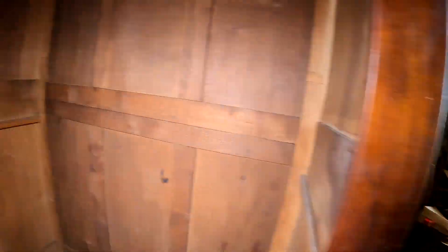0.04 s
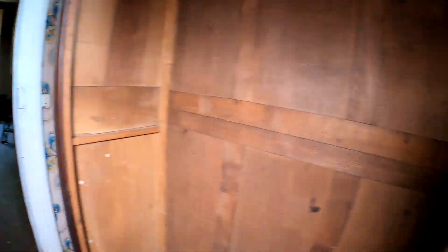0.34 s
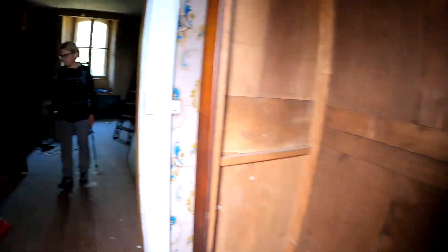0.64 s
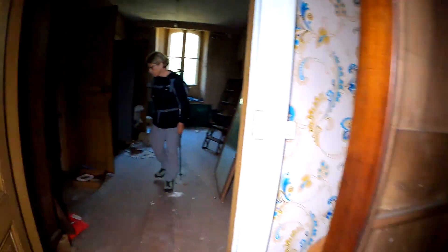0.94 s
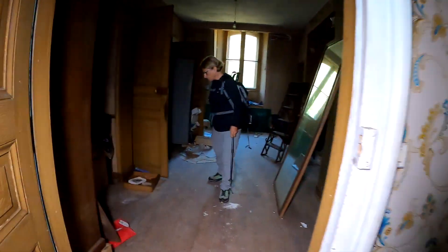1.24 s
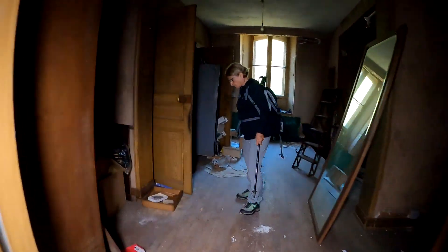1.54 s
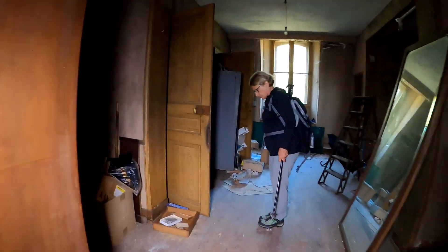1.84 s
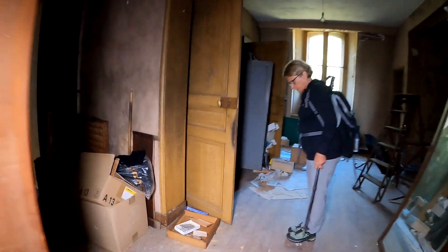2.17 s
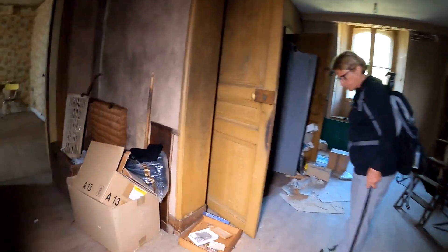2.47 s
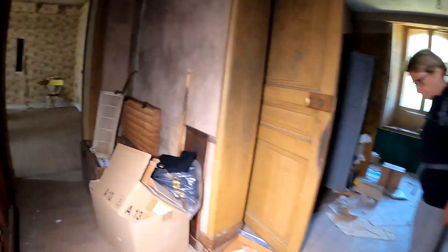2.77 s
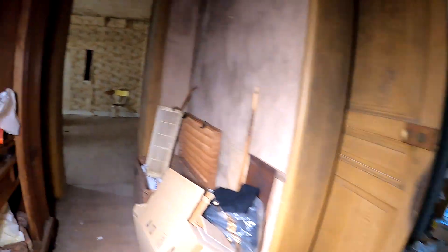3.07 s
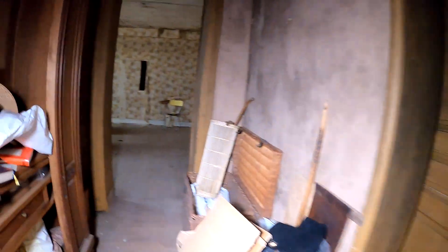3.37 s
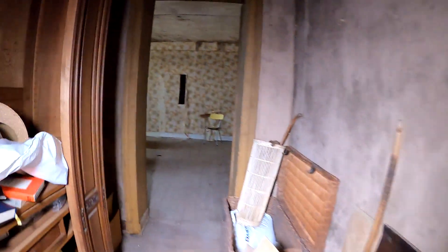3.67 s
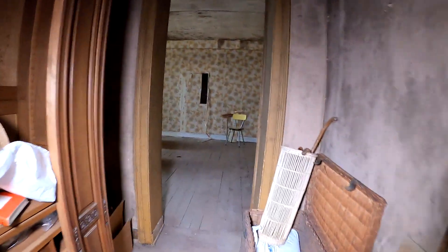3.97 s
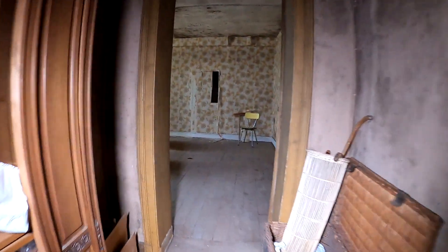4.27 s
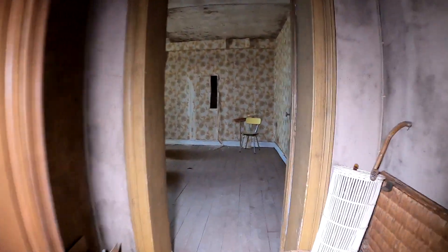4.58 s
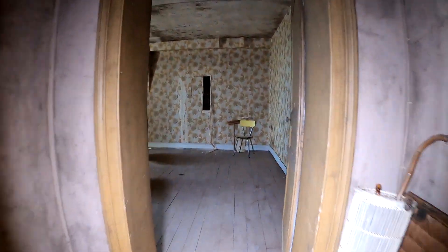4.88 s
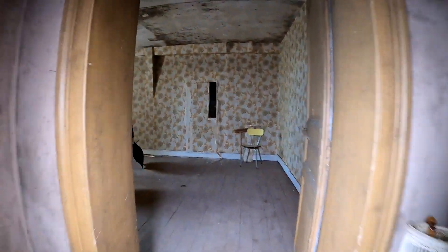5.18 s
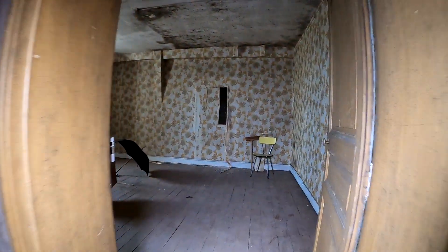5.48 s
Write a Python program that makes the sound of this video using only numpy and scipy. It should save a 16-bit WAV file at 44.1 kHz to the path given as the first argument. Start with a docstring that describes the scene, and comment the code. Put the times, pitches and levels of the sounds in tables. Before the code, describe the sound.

Slow footsteps cross bare wooden floorboards in an empty old house, heard close from a hand-held microphone. A light first step cracks a dry board at 0.2 seconds. Three heavy, hollow steps follow at about 0.9, 1.7 and 2.4 seconds, each ringing the floor with a low thump; the middle one is loudest and has a sharp heel click. The walker hesitates with two softer steps near 3.0 and 3.8 seconds, and boards crack at 3.1 and 4.0 seconds. Two firm, deep steps land at 4.5 and 5.3 seconds, the last followed by a cluster of cracks until about 5.5 seconds. The bare rooms add a short echo to every thud and crack. Far beneath them, dust hisses under the soles, clothes rustle and sleeves swish, with a slight handling rumble, quiet room air and a barely audible thin electronic whine.

```python
"""An empty old house: still air, a thin camera whine, the rustle of clothes and a faint hand-held rumble.
A first light step cracks a dry floorboard. Three slow, heavy steps follow, each ringing its board,
the whole floor and the joists, while dust hisses under the sole and the bare rooms echo.
Around 3 s the walker hesitates for two softer steps; boards crack under the load and sleeves swish by.
Two firm steps go on from 4.5 s, the last in a cluster of cracks."""
import sys
import numpy as np
from scipy import signal
from scipy.fft import rfft, irfft, next_fast_len
from scipy.io import wavfile

SR = 44100
rng = np.random.default_rng(int(sys.argv[2]) if len(sys.argv) > 2 else 0)


def digitize_waveform(pressure):
    """Quantize a signal to 16-bit integers and store it at the path in sys.argv[1].

    Rows of a 2-D input are taken as channels; values are limited to [-1, 1].
    """
    field = np.atleast_2d(pressure).T
    bounded = np.clip(field, -1, 1)
    quanta = np.round(bounded * 32767).astype(np.int16)
    wavfile.write(sys.argv[1], SR, quanta)


N = 247700
TIME = np.arange(N) / SR

# EQ curves of the noise layers: frequency_hz, gain_db
AIR_EQ = [(25, -15), (70, -29), (130, -21), (270, -8), (450, -14.5), (750, -23.5), (1300, -15.5),
          (3300, -24.5), (5000, -18.5), (8000, -27.5), (12000, -44), (15000, -69)]  # room tone
CLOTH_EQ = [(80, -39), (130, -8), (200, 0.5), (300, -1), (450, -10.5), (750, -13), (1300, -5.5),
            (1700, -7.5), (2500, -6.5), (3500, -3.5), (4300, -22.5), (5300, -17), (8000, -34.5),
            (12000, -48), (15000, -69)]  # rubbing clothes
SLEEVE_EQ = [(2500, -17), (3500, 4.5), (6000, -9), (8500, -13), (11000, -26), (13500, -27), (15500, -50)]  # hissing sleeves
RUMBLE_EQ = [(8, -24), (25, -14.5), (36, -9), (55, -22), (90, -38.5), (200, -43.5), (1000, -79.5)]  # the hand on the camera
WOOD_EQ = [(100, -21.5), (300, 13.5), (550, 4), (800, -1.5), (1100, 0), (1500, 0), (2400, -1.5),
           (3300, 3.5), (4400, -7.5), (7000, -11), (11000, -29.5), (15000, -37)]  # cracking wood
GRIT_EQ = [(300, -6), (550, -2), (900, -1.5), (1500, 0.5), (3300, 1), (4500, -10), (8000, -20.5),
           (12000, -36), (15000, -46.5)]  # dust under the sole
# neighbouring boards jostled by a blow
JOSTLE_EQ = [(30, -40), (60, -5), (100, -1), (260, 0.5), (380, -6.5), (550, -16), (900, -30.5),
             (2500, -72)]
# body movement as the walker sets off, hesitates and goes on: time_s, relative_db
MOTION_CURVE = [(0.14, -63), (0.32, -58.5), (0.95, -53.5), (1.45, -54.5), (2.05, -54.5), (2.55, -56),
                (2.88, -59.5), (3.35, -52), (3.65, -56), (3.9, -52.5), (4.55, -53), (5.6, -55)]
# a sleeve sweeps past the body: peak_s, half_length_s, relative_hiss_db, relative_rub_db
SLEEVE_SWEEPS = [(0.729, 0.082, -66, -54), (1.506, 0.12, -76, -56), (2.047, 0.075, -92, -54),
                 (3.465, 0.13, -63.5, -57), (4.139, 0.088, -61, -51.5), (4.93, 0.081, -66.5, -51)]
# light shifts of weight, and at 4.003 s a board thumped by the crack just before: start_s, level_db, pitch_hz
LIGHT_TOUCHES = [(0.006, -37.5, 290), (1.082, -36, 223), (1.12, -30, 117), (1.592, -31.5, 125),
                 (2.522, -35.5, 300), (3.088, -28.5, 226), (3.872, -34.5, 374), (4.003, -37, 220),
                 (4.369, -46, 164), (5.471, -34, 207)]
# the heel strikes, the weight follows, the sole comes down, the toe pushes off:
# start_s, heel_db, heel_hz, load_db, load_hz, sole_delay_s, sole_db, sole_hz,
# toe_delay_s, toe_db, sway_db, click_db, click_hz
FOOTSTEPS = [ (0.193, -46, 339, -51, 260, 0.023, -34, 255, 0.18, -45.5, -67, -42, 2000),
             (0.902, -13, 201.5, -9, 111, .052, -31, 196, .098, -26, -45, -38.5, 1230),
             (1.658, -2.5, 215.7, -19, 151, .041, -14, 203, .163, -25, -55, -19.5, 1950),
             (2.351, -11.5, 139.7, -16, 73, 0.051, -18, 159.5, 0.12, -22, -32, -35, 1180),
             (3.036, -32.5, 238, -25, 157, 0.091, -21.5, 174, .18, -34, -40, -56, 2200),
             (3.761, -54, 276, -33.5, 106, .065, -42, 312, 0.22, -36, -35.5, -42, 2620),
             (4.517, -16.5, 302.3, -12, 167, 0.038, -16.5, 264.4, .197, -30.5, -18, -32, 980),
             (5.269, -24.5, 260, -15, 119.3, 0.079, -21.5, 210, .15, -27.5, -22.5, -41, 1400)]
# resonances of the floor on its joists: pitch_hz, relative_db, t60_s
FLOOR_RESONANCES = [(72.4, -19.5, 0.46), (111.8, -13, 0.65), (149.4, -51, 0.38), (185.2, -15.5, 0.91),
                    (214, -35, .4), (257, -19, 0.2), (330, -32, 0.28), (331, -17, 0.73), (383, -35, 0.59),
                    (458, -21.5, 0.17)]
# reverb time of the bare rooms: frequency_hz, t60_s
ROOM_DECAY = [(60, 0.81), (200, 0.25), (500, 0.54), (1500, 0.42), (4000, 0.36), (12000, 0.18)]
# dry boards cracking:
# start_s, body_db, low_hz, high_hz, ring_hz, t60_s, edge_db, plank_db, left_minus_right_db
BOARD_CRACKS = [ (0.1875, -22, 1380, 2480, 2700, 0.026, -66, -47.5, -1),
                (0.5175, -30, 2400, 5040, 2680, 0.0069, -61, -80, 0.5),
                (1.275, -35, 950, 1500, 1176, .014, -72, -53.5, -2),
                (1.562, -44, 600, 4000, 2000, 0.12, -51.5, -53, -0.5),
                (2.7963, -40.5, 1196, 1750, 1410, 0.028, -74, -73, 0),
                (3.1104, -25.5, 890, 4200, 1900, 0.05, -22.5, -31.5, 0.5),
                (3.998, -30.5, 740, 5200, 1750, 0.066, -35, -40.5, -1),
                (5.305, -31, 298, 4670, 1070, 0.087, -31.5, -34.5, 3.5),
                (5.327, -27, 403, 5000, 1090, 0.12, -30, -27, -0.5),
                (5.471, -28, 302, 6500, 2026, 0.044, -32.5, -42, 0)]
# stereo width of diffuse sound at the two microphone ports: frequency_hz, side_minus_mid_db
MIC_WIDTH = [(30, -7.5), (120, -20), (300, -16.5), (600, -13), (1500, -17), (2800, -13.5), (4500, -5.5),
             (8000, -6.5), (12000, -1)]
# balance of the ports: frequency_hz, left_minus_right_db
MIC_BALANCE = [(30, 1), (120, 0.2), (250, 1), (500, 2), (1000, 2.5), (2400, 5.5), (3600, 6.5), (5000, 3),
               (8000, -2.2), (12000, -3)]
# phase between the ports: frequency_hz, left_lag_rad
MIC_LAG = [(30, 0.31), (250, 0.0052), (1000, 0.36), (3500, 1.11), (8000, 1.58), (14000, 1.3)]


def undb(db):
    """Decibels to gain."""
    return 10 ** (np.asarray(db) / 20)


def along(points, hz):
    """Read a curve on a log-frequency axis."""
    point_hz, value = np.transpose(points)
    return np.interp(np.log(np.maximum(hz, 1)), np.log(point_hz), value)


def equalise(x, curve):
    """Shape x with an EQ curve."""
    size = next_fast_len(x.shape[-1])
    gain = undb(along(curve, np.fft.rfftfreq(size, 1 / SR)))
    return irfft(rfft(x, size) * gain, size)[..., :x.shape[-1]]


def unit(x):
    """Scale to rms 1."""
    return x / np.sqrt(np.mean(x ** 2))


def fade(t, t60):
    """Exponential decay, 60 dB down at t60."""
    return np.exp(-np.log(1000) * t / t60)


def ring(hz, t60):
    """One second of a struck resonance."""
    t = TIME[:SR]
    return np.sin(2 * np.pi * hz * t) * fade(t, t60)


def add(out, start_s, x):
    """Mix x into out at start_s."""
    i = int(np.clip(start_s * SR, 0, N - 1))
    out[..., i:i + x.shape[-1]] += x[..., :N - i]


def convolve(x, response):
    """Play x through an impulse response, one row a channel."""
    return signal.fftconvolve(np.atleast_2d(x), np.atleast_2d(response), axes=1)[:, :N]


def diffuse(size, width_db=0):
    """Stereo noise, narrow in the bass and wider in the treble."""
    mid, side = rng.standard_normal((2, size))
    side = equalise(side, MIC_WIDTH) * undb(width_db)
    return unit(np.array([mid + side, mid - side]))


def noise_bed(curve, width_db=0):
    """Scene-long stereo noise with an EQ curve, at rms 1."""
    return unit(equalise(diffuse(N, width_db), curve))


def room_tone(air_db=-66.5, whine_db=-73, whine_hz=5060):
    """The still air of the house and a thin electronic whine from the camera."""
    whine = unit(np.sin(2 * np.pi * whine_hz * TIME))
    return undb(air_db) * noise_bed(AIR_EQ) + undb(whine_db) * whine


def body_swing(peak_share=0.21):
    """The body swings between -1 and 1 from heel to heel, peaking just after each strike."""
    heels = [step[0] for step in FOOTSTEPS]
    heels.append(2 * heels[-1] - heels[-2])
    steps_taken = np.interp(TIME, heels, np.arange(len(heels)))
    return np.cos(2 * np.pi * (steps_taken - peak_share))


def clothes_and_handling(cloth_db=-1, sleeve_db=4.5, rumble_db=-2, flutter_db=2, flutter_hz=45):
    """Clothes rub and swish in small catches as the body moves; each stride jogs the camera."""
    swing = body_swing()
    motion = undb(np.interp(TIME, *np.transpose(MOTION_CURVE)) + 0.5 * swing)
    rub, hiss = motion, undb(-18.5) * motion  # the sleeves hiss softly even between sweeps
    for peak_s, half_length_s, hiss_db, rub_db in SLEEVE_SWEEPS:
        sweep = np.exp(-((TIME - peak_s) / half_length_s) ** 2)
        rub = np.hypot(rub, undb(rub_db) * sweep)
        hiss = hiss + undb(hiss_db) * sweep
    cloth = undb(cloth_db) * rub * noise_bed(CLOTH_EQ, width_db=7)
    sleeves = undb(sleeve_db) * hiss * noise_bed(SLEEVE_EQ)
    rumble = motion * undb(rumble_db + 3 * swing) * noise_bed(RUMBLE_EQ)
    catches = np.interp(TIME * flutter_hz, np.arange(1024), rng.standard_normal(1024))
    return (cloth + sleeves) * undb(flutter_db * catches) + rumble


def board_contacts(graze_lead_s=0.045, graze_hz=230, load_delay_s=0.00656):
    """Every touch of shoe on board, and the thump of a cracking board: start_s, level_db, pitch_hz."""
    touches = list(LIGHT_TOUCHES)
    for start_s, heel_db, heel_hz, load_db, load_hz, *sole_and_toe in FOOTSTEPS:
        sole_delay_s, sole_db, sole_hz, toe_delay_s, toe_db, *_ = sole_and_toe
        touches += [(start_s - graze_lead_s, min(-52.5, heel_db - 16), graze_hz),
                    (start_s, heel_db, heel_hz),
                    (start_s + load_delay_s, load_db, load_hz),
                    (start_s + sole_delay_s, sole_db, sole_hz),
                    (start_s + toe_delay_s, toe_db, load_hz)]
    return touches


def footfalls(firm_db=-34, roll_db=-4, scuff_db=-26, load_cycles=0.52, low_cut_hz=54.2, floor_db=-5):
    """A shoe rings the board it lands on, and the board shakes the whole floor."""
    boards, t = np.zeros(N), TIME[:SR]
    jostle = unit(equalise(rng.standard_normal(N + SR), JOSTLE_EQ))
    scuff = undb(scuff_db) * fade(t, t60=0.25)
    for start_s, level_db, pitch_hz in board_contacts():
        noise = jostle[int(abs(start_s) * SR):][:SR]
        # a firm heel rings the board cleanly; a light touch rolls over it and only makes it rumble
        firmness = 1 / (1 + undb(2 * (firm_db - level_db)))
        # higher boards die sooner, and a light touch damps them less
        t60 = 0.071 * (199 / pitch_hz) ** 0.27 * 1.38 ** (1 - firmness)
        rumble = unit(signal.lfilter(*signal.iirpeak(pitch_hz, Q=1.2, fs=SR), noise))
        roll = undb(roll_db) * rumble * fade(t, 2.18 * t60)
        blow = firmness * ring(pitch_hz, t60) + (1 - firmness) * roll + scuff * noise
        # rubber takes part of a cycle to load the wood
        attack = 1 - np.exp(-(t * pitch_hz / load_cycles) ** 2)
        add(boards, start_s, undb(level_db) * blow * attack)
    boards = signal.sosfilt(signal.butter(2, low_cut_hz, "highpass", fs=SR, output="sos"), boards)
    floor = sum(undb(db) * hz / SR * ring(hz, t60) for hz, db, t60 in FLOOR_RESONANCES)
    return boards + undb(floor_db) * convolve(boards, floor)[0]


def room_echo(x, wet_db, build_s, new_tail_s=1.45):
    """Bare walls answer with a dense tail, shortest in the treble and new at each place on the way."""
    out, t = np.zeros((2, N)), TIME[:SR // 2]
    centres_hz = np.geomspace(60, 12000, 6)
    bins_hz = np.fft.rfftfreq(len(t), 1 / SR)
    bands = [along(np.c_[centres_hz, share], bins_hz) for share in np.eye(len(centres_hz))]
    build = 1 - np.exp(-(t / build_s) ** 2)
    decays = [fade(t, along(ROOM_DECAY, hz)) * build for hz in centres_hz]
    block = int(new_tail_s * SR)
    for i in range(0, N, block):
        spectrum = rfft(diffuse(len(t)))
        tail = sum(irfft(spectrum * band, len(t)) * decay for band, decay in zip(bands, decays))
        add(out, i / SR, convolve(x[..., i:i + block], unit(tail) / np.sqrt(len(t))))
    return undb(wet_db) * out


def wood_hits():
    """Heel clicks and three-layer cracks: start_s, level_db, low_hz, high_hz, ring_hz, t60_s, pan_db."""
    hits = []
    for start_s, *_, click_db, click_hz in FOOTSTEPS:
        t60 = 0.1 * undb(min(-34.5 - click_db, 0))  # the hardest clicks are shorter
        hits.append((start_s, click_db, 0.39 * click_hz, 1.35 * click_hz, click_hz, t60, 0))
    for start_s, body_db, low_hz, high_hz, ring_hz, t60, edge_db, plank_db, pan_db in BOARD_CRACKS:
        edge = (start_s, edge_db, 2700, 13000, 13000, 0.013, pan_db)  # the first fibres split
        body = (start_s, body_db, low_hz, high_hz, ring_hz, t60, pan_db)
        knock = (start_s + 0.006, plank_db, 580, 1400, 1150, 0.12, pan_db)  # the whole plank answers
        hits += [edge, body, knock]
    return hits


def cracks_and_clicks(grain_db=3, grain_s=0.0009, rise_s=0.0012, ring_db=1):
    """Splitting or struck wood lets go in a quick burst of tiny slips that ring the plank."""
    out, t = np.zeros((2, N)), TIME[:8192]
    for start_s, level_db, low_hz, high_hz, ring_hz, t60, pan_db in wood_hits():
        envelope = fade(t, t60) * (1 - np.exp(-t / rise_s))
        grain = np.interp(t / grain_s, np.arange(len(t)), rng.standard_normal(len(t)))
        slips = undb(grain_db * grain) * diffuse(len(t))
        burst = envelope * equalise(slips, WOOD_EQ)
        burst += undb(ring_db) * signal.lfilter(*signal.iirpeak(ring_hz, Q=4, fs=SR), burst)
        for hz, kind in (low_hz, "highpass"), (high_hz, "lowpass"):
            burst = signal.sosfilt(signal.butter(2, hz, kind, fs=SR, output="sos"), burst)
        envelope_rms = np.sqrt(np.mean(envelope ** 2))
        stereo_gain = undb(level_db + np.array([[pan_db], [-pan_db]]) / 2)
        add(out, start_s, unit(burst) * envelope_rms * stereo_gain)
    return out


def grit(level_db=-55, attack_s=0.0051, hold_s=0.17, t60_s=0.41):
    """Dust hisses under each sole as it rolls down."""
    pressure, t = np.zeros(N), TIME[:SR]
    roll = (1 - np.exp(-t / attack_s)) * fade(np.maximum(t - hold_s, 0), t60_s)
    for start_s, *_ in FOOTSTEPS:
        add(pressure, start_s, roll)
    return undb(level_db) * pressure * noise_bed(GRIT_EQ, width_db=2.5)


def joists(pitch_hz=28.4, t60_s=0.46, attack_s=0.01, delay_s=0.013, push_off_db=-15):
    """The joists sway in the sub-bass as the weight lands, and more softly as the toe pushes off."""
    out = np.zeros(N)
    sway = ring(pitch_hz, t60_s) * (1 - np.exp(-TIME[:SR] / attack_s))
    for start_s, *_, toe_delay_s, _, sway_db, _, _ in FOOTSTEPS:
        add(out, start_s + delay_s, undb(sway_db) * sway)
        add(out, start_s + toe_delay_s, undb(sway_db + push_off_db) * sway)
    return out


def scene():
    """Steps and cracks with their echoes, over a bed of rustle and room tone."""
    thuds, snaps = footfalls(), cracks_and_clicks()
    echoes = room_echo(thuds, wet_db=-8, build_s=0.014) + room_echo(snaps, wet_db=-5, build_s=0.0041)
    return thuds + joists() + snaps + echoes + grit() + clothes_and_handling() + room_tone()


def record(dry, high_cut_hz=15000):
    """The left microphone port hears more midrange and lags slightly; the top end is cut."""
    size = next_fast_len(N)
    hz = np.fft.rfftfreq(size, 1 / SR)
    sides = np.array([[0.5], [-0.5]])
    balance = undb(sides * along(MIC_BALANCE, hz))
    lag = np.exp(-1j * sides * along(MIC_LAG, hz))
    heard = irfft(rfft(dry, size) * balance * lag, size)[:, :N]
    return signal.sosfilt(signal.ellip(8, 0.2, 70, high_cut_hz, fs=SR, output="sos"), heard)


dry = scene()
out = record(dry)
digitize_waveform(out)
```